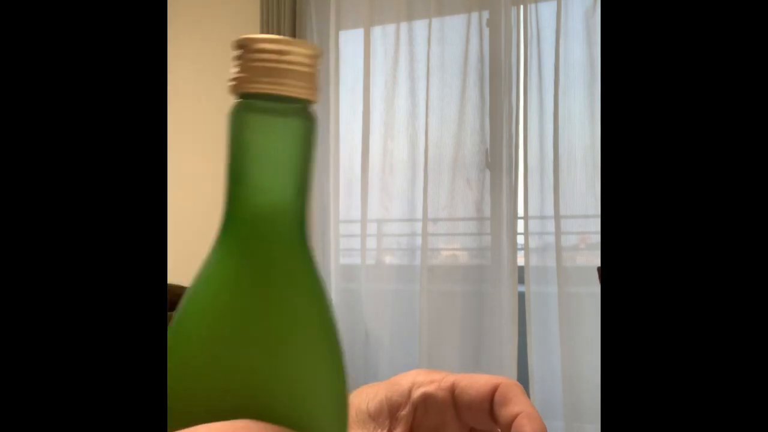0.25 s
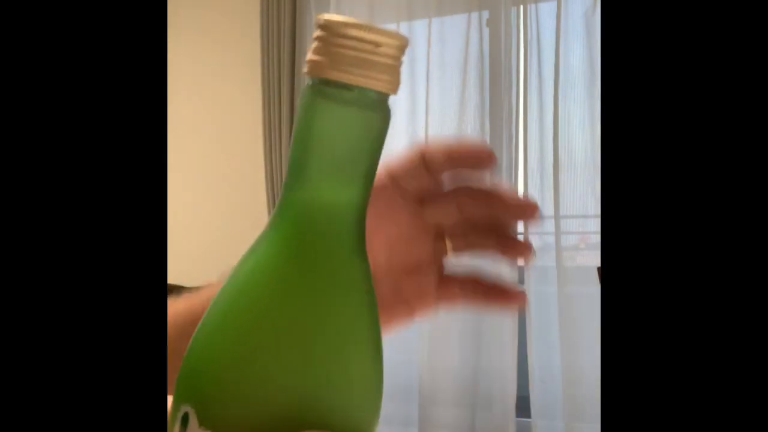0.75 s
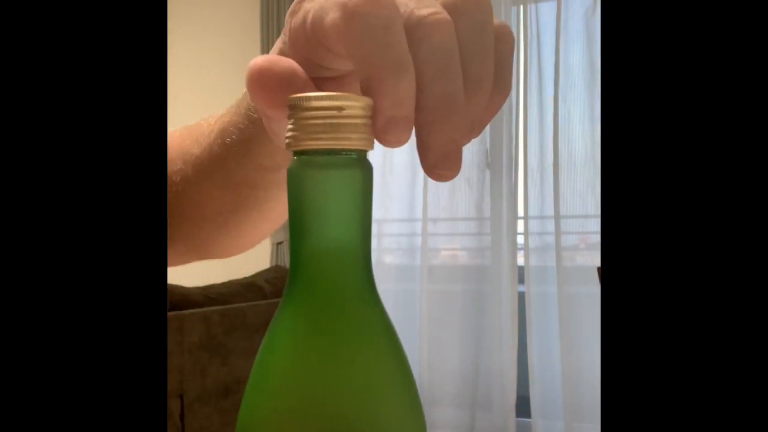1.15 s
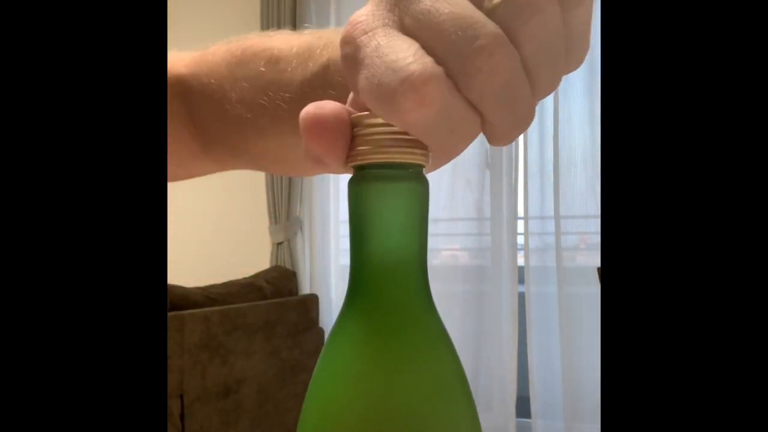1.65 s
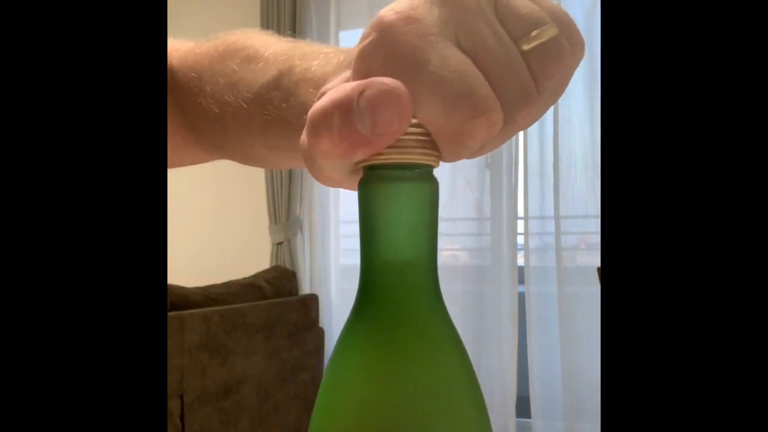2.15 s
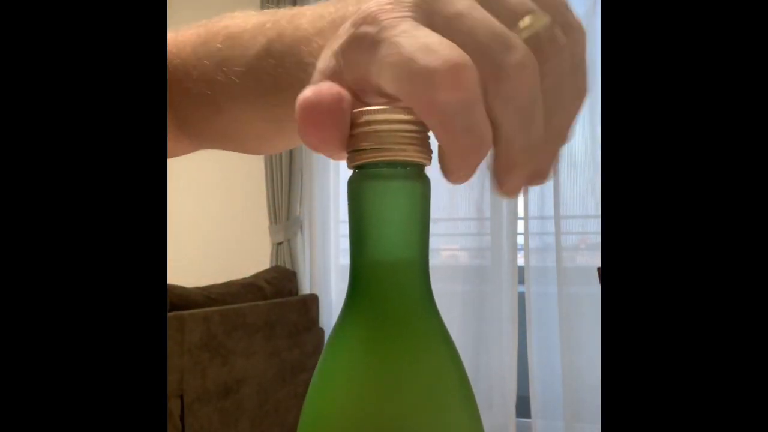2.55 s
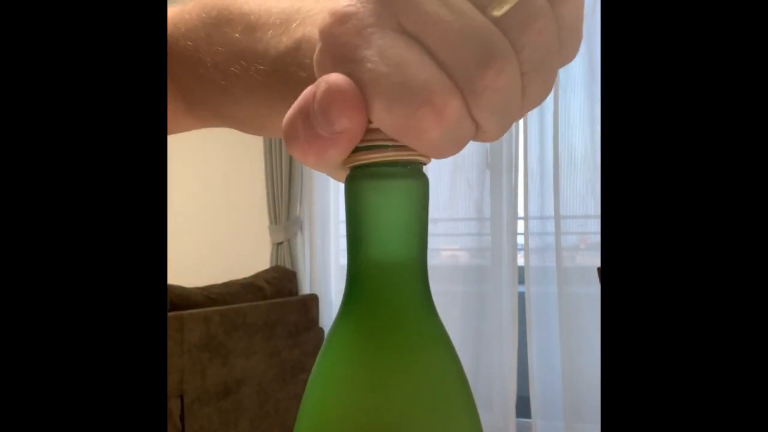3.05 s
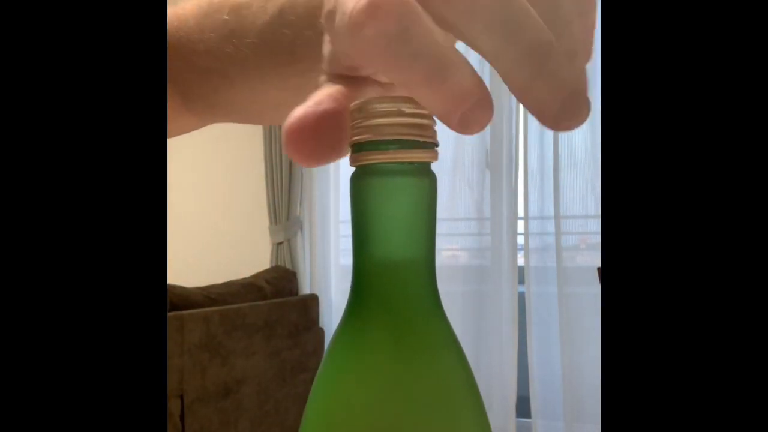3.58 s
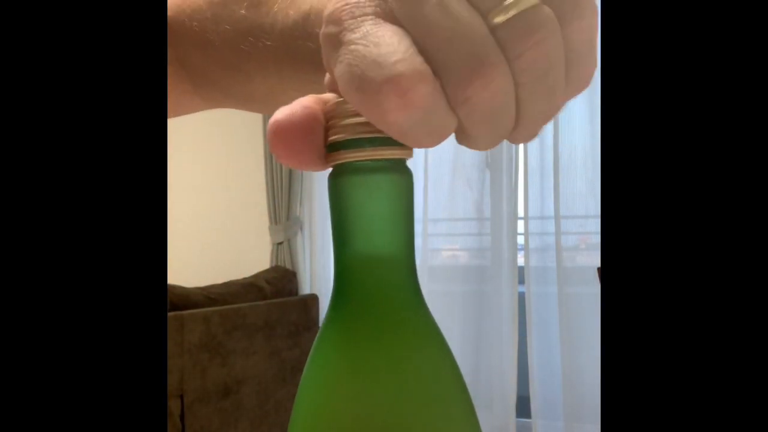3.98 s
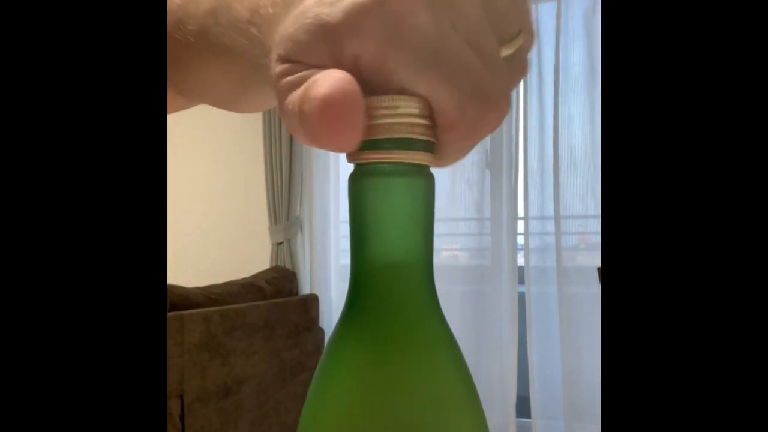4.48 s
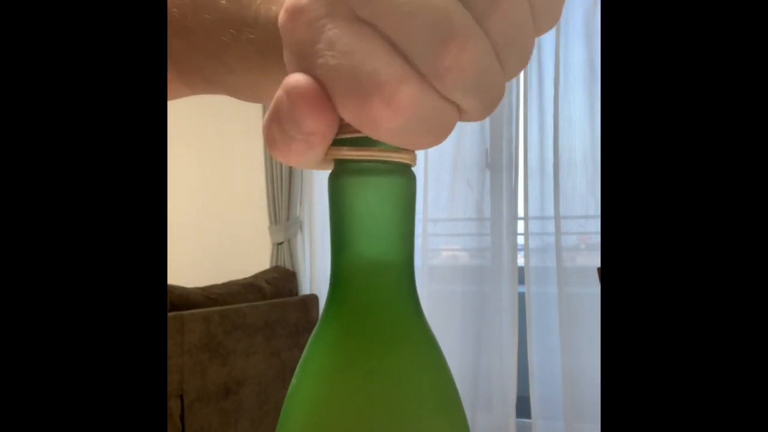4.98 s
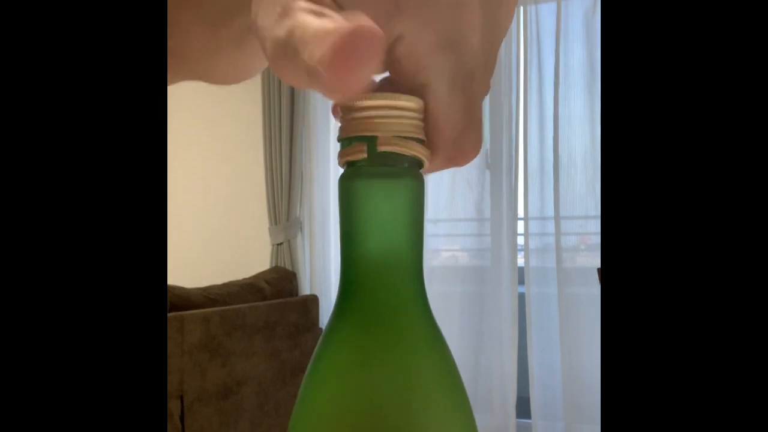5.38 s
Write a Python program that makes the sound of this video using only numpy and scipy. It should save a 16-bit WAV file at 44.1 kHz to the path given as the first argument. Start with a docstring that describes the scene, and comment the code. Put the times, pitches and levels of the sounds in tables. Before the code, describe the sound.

Close up, dull table thumps, then crisp metallic cracks and faint thread scraping as a bottle's screw cap is twisted loose in a small room.

```python
"""A metal screw cap is twisted off a glass bottle on a table, close to a phone on the same table.
First the base knocks and judders: dispersed bending waves (treble first) ring the table's modes.
From about 1.5 s the tapped glass pings faintly; from 2.1 s skin hisses, threads grind, metal squeaks and tears.
Bridges of the seal snap as short noise cracks near 2.2, 3.0 and 5.1 s; at 5.37 s the last goes and the cap rings.
A small living room adds a diffuse tail throughout, over a low background of coloured noise."""
import sys
import numpy as np
from scipy import signal
from scipy.fft import rfft, irfft
from scipy.io import wavfile
from scipy.ndimage import uniform_filter1d, minimum_filter1d

SR = 44100
rng = np.random.default_rng(int(sys.argv[2]) if len(sys.argv) > 2 else 0)


def dump(signal):
    """Clip the signal to [-1, 1] and save it as 16-bit WAV at the path in sys.argv[1]."""
    limited = np.clip(np.atleast_2d(signal).T, -1, 1)
    pcm = np.round(limited * 32767).astype(np.int16)
    wavfile.write(sys.argv[1], SR, pcm)


N = 247842
SIZE = 16384  # FFT length of a knock, samples
TIME = np.arange(N) / SR  # s
FREQ = np.arange(SIZE // 2 + 1) * SR / SIZE  # Hz


def undb(db):
    """Decibels to gain."""
    return 10 ** (np.asarray(db) / 20)


def along(points, hz):
    """Read (Hz, value) points on a log-frequency axis."""
    at_hz, value = np.transpose(points)
    return np.interp(np.log(hz + 1), np.log(at_hz), value)


def unit(x):
    """Scale to rms 1."""
    return x / np.sqrt(np.mean(x ** 2))


def tint(x, points):
    """Give a sound the colour of (Hz, dB) points."""
    n = x.shape[-1]
    hz = np.arange(n // 2 + 1) * SR / n
    return irfft(rfft(x) * undb(along(points, hz)), n)


def blow(x, length_s):
    """Give a hit the energy of an rms-1 burst of this length."""
    return unit(x) * np.sqrt(length_s * SR / x.shape[-1])


def add(out, s, sound):
    """Mix a sound in at time s."""
    i = int(s * SR)
    out[:, i:i + sound.shape[-1]] += sound[..., :N - i]


def efforts(rows, sounds):
    """Each effort of the hand builds to a peak and lets go, driving every sound at its own level."""
    out = np.zeros((2, N))
    for s, rise_s, fall_s, *levels_db in rows:
        effort = np.exp(np.minimum((TIME - s) / rise_s, (s - TIME) / fall_s))
        out += effort * sum(undb(db) * sound for db, sound in zip(levels_db, sounds))
    return out


# phase of the left channel ahead of the right: f/Hz, lead/rad
CHANNEL_LEAD = [(200, 0), (1700, 2.5), (4000, .4), (5500, 2.6), (7000, 1.7), (9100, 3.15), (12000, 5.45),
                (14000, 6.28), (16000, 7.1)]


def to_stereo(x):
    """Spread a sound over two channels, the right one lagging by a frequency-dependent phase."""
    lead_rad = along(CHANNEL_LEAD, np.arange(len(x) // 2 + 1) * SR / len(x))
    return np.array([x, irfft(rfft(x) * np.exp(-1j * lead_rad), len(x))])


def stereo_noise(likeness):
    """Noise in two channels; likeness is the shared fraction of its power."""
    c = np.clip(likeness, 0, 1)
    shared = to_stereo(rng.standard_normal(N))
    return np.sqrt(c) * shared + np.sqrt(1 - c) * rng.standard_normal((2, N))


# spectrum of the quiet room, relative: f/Hz, density/dB
HUSH = [(15, -37), (25, -17), (53, -1), (83, -11), (208, -17.5), (238, -23.5), (304, -14.5), (510, -19),
        (600, -26.5), (878, -25.5), (1470, -33.5), (2400, -36.5), (3320, -51.5), (9000, -63.5),
        (14000, -61.5), (16500, -70.5)]


def hush(level_db=-50.5, knot_s=.1):
    """Low background of the room: coloured noise whose level wavers by about 1 dB."""
    knots_s = np.arange(0, TIME[-1], knot_s)
    waver_db = np.interp(TIME, knots_s, rng.standard_normal(len(knots_s)))
    return unit(tint(stereo_noise(0.08), HUSH)) * undb(level_db + waver_db)


# decay of the room's tail: f/Hz, t60/s
ROOM_T60 = [(80, 1), (350, .5), (1000, 0.45), (4000, 0.43), (8000, 0.33), (15000, 0.24)]
# tail level per band, before each source's wet gain: f/Hz, level/dB
ROOM_SHARE = [(60, -12.5), (200, -12), (400, -5.5), (1000, -6.5), (2500, -6.5), (6000, -5), (8300, -15),
              (12000, -12), (16000, -17.5)]
# shared fraction of the tail's power in the two channels: f/Hz, likeness/0-1
ROOM_LIKENESS = [(300, .3), (4000, 0.4), (8000, 1)]


def room(x, gap_s=0.0065, build_s=0.00065):
    """A diffuse tail, band by band, that sets in after the first wall is reached."""
    t = TIME[:2 * SIZE]
    hz = np.arange(SIZE + 1) * SR / len(t)
    alike = np.clip(along(ROOM_LIKENESS, hz), 0, 1)
    shared = rfft(rng.standard_normal(len(t)))
    separate = rfft(rng.standard_normal((2, len(t))))
    spectrum = np.sqrt(alike) * shared + np.sqrt(1 - alike) * separate
    centres_hz = np.geomspace(60, 16000, 17)
    onset = 1 - np.exp(-np.maximum(t - gap_s, 0) / build_s)
    tail = 0
    for centre_hz, band in zip(centres_hz, np.eye(len(centres_hz))):
        fade = onset * np.exp(-np.log(1000) * t / along(ROOM_T60, centre_hz))
        # overlapping triangular bands
        noise = irfft(spectrum * np.interp(np.log(hz + 1), np.log(centres_hz), band))
        tail = tail + noise * fade / np.linalg.norm(fade) * undb(along(ROOM_SHARE, centre_hz))
    return signal.fftconvolve(x, tail, axes=1)[:, :N]


def bending_waves(first_s=.004, spread_s=.016, fade_s=0.034, echo_db=-5.0, apart=0.63, long_hz=220, count=12):
    """Direct wave and edge reflections in the table; travel time (given at 500 Hz) grows towards the bass."""
    extra_s = spread_s * (np.arange(count) + rng.random(count)) / count
    strength = undb(echo_db) * np.exp(-extra_s / fade_s) * rng.choice([-1, 1], count)
    phase_per_s = -4j * np.pi * np.sqrt(500 * FREQ)
    channel_strength = strength * (1 + apart * rng.standard_normal((2, count)))
    echoes = channel_strength @ np.exp(np.outer(extra_s, phase_per_s))
    # long waves lift the whole top at once; short ones scatter and differ between the channels
    short = FREQ ** 2 / (FREQ ** 2 + long_hz ** 2)
    return np.exp(phase_per_s * first_s) * (1 + short * echoes) / np.hypot(1, short * np.linalg.norm(strength))


# table top under the bottle: f/Hz, width/Hz, level/dB, left minus right/dB, left lead/rad
TABLE_MODES = [(215, 130, -0.5, 1, 1.2), (373, 36.4, 11.5, 9, 2.5), (511.6, 34, 7.5, -4.5, 1),
               (701.5, 45, 12, 1, -1.15), (880, 23, 6, 10, 5.5), (1084, 10, 7, 0, 1),
               (1270, 140, 6, 6, 2.0), (1435, 70, -1, -3.5, 0), (1700, 50, -1.5, 3.5, 3),
               (2000, 88, 3, -2.5, 2), (2410, 450, 10.5, -2.5, -3.5)]
# colour of a knock: f/Hz, level/dB
KNOCK_COLOUR = [(25, -9.5), (50, -3.5), (85, 11), (160, 7.5), (260, 4.5), (400, 3), (600, 2), (850, 8),
                (1300, 3.5), (2200, 0.5), (4000, -10.5), (7000, -25.5), (10000, -41.5), (16000, -43)]


def knock(thud_db, ring_db, edge_db, place_db=2.6, twist_rad=1.7, twist_hz=190):
    """One bump: dispersed waves ring the table's modes, a little differently at each spot of the base."""
    sides = np.array([[.5], [-.5]])
    # the phone rocks on the table, so the channels move out of step above the deep bass
    rocking = FREQ ** 2 / (FREQ ** 2 + twist_hz ** 2)
    body = np.exp(1j * sides * twist_rad * rocking)
    for hz, width_hz, db, pan_db, lead_rad in TABLE_MODES:
        mode = 1j * FREQ * width_hz / (hz ** 2 - FREQ ** 2 + 1j * FREQ * width_hz)
        level = undb(db + place_db * rng.standard_normal() + sides * pan_db)
        body = body + mode * level * np.exp(1j * sides * lead_rad * rocking)
    contact_db = along([(170, thud_db), (380, 0), (750, ring_db), (2400, edge_db)], FREQ)
    spectrum = body * bending_waves() * undb(contact_db + along(KNOCK_COLOUR, FREQ))
    return irfft(spectrum)[:, :SIZE // 2]


# the base bumps the table: t/s, level/dB, thud/dB, upper ring/dB
KNOCKS = [(0.334, -17.5, -7.5, -5), (0.463, -21, -7.5, 9), (0.54, -26, -19.5, 3.5),
          (1.193, -4.5, 0.5, -10.5), (1.416, -5, 0, -5), (1.511, -22, -19, -7), (1.661, -23.5, -10.5, -20),
          (1.804, -31, -8.5, -13.5), (2.102, -21.5, -19.5, -9), (2.391, -30, -2, -14.5),
          (2.708, -18, -10, -11), (2.875, -24.5, -7, -9.5), (3.804, -30, -4.5, -9.5),
          (4.132, -25.5, -7, -11.5), (4.3, -15.5, -2, -4.5), (4.475, -33.5, 2, -14),
          (4.856, -22.5, -5, -15.5), (5.13, -18, 5.5, -14.5), (5.278, -12, -8, -9), (5.361, -7, -13, -8),
          (5.372, -11, -1.5, -1.5)]
# sharper edge for harder, more ringing bumps: dB at level 0, dB per dB of level, dB per dB of ring
EDGE_DB, EDGE_PER_LEVEL, EDGE_PER_RING = -9.5, 0.58, 0.48
# jolt of a snap: lag, level relative to the snap, (thud/dB, upper ring/dB, edge/dB)
JOLT_LAG_S, JOLT_DB, JOLT_COLOUR = .0015, -21.5, (2.5, -5.5, -16)


def bumps():
    """Every blow on the table, from knocks and from the snaps jolting the bottle, with its edge level."""
    blows = []
    for s, db, thud_db, ring_db in KNOCKS:
        edge_db = EDGE_DB + EDGE_PER_LEVEL * db + EDGE_PER_RING * ring_db
        blows.append((s, db, thud_db, ring_db, edge_db))
    for s, db, _, _ in SNAPS:
        blows.append((s + JOLT_LAG_S, db + JOLT_DB, *JOLT_COLOUR))
    return blows


def knocks(scuff_db=-9, before_s=0.0047, after_s=0.0032, scuff_hz=900, early_s=.0016, length_s=0.0093):
    """The knurled base lands on several points, so a brief scuff surrounds each bump."""
    out = np.zeros((2, N))
    t = TIME[:2048] - TIME[1024]
    for s, db, thud_db, ring_db, edge_db in bumps():
        scuff = rng.standard_normal(len(t)) * np.exp(np.minimum(t / before_s, -t / after_s))
        scuff = tint(scuff / np.linalg.norm(scuff), [(100, -12), (scuff_hz, 0)])
        force = (t == 0) + undb(scuff_db) * scuff
        wave = signal.fftconvolve(knock(thud_db, ring_db, edge_db), force[None], axes=1)
        add(out, s + t[0] - early_s, undb(db) * blow(wave, length_s))
    return out


LEAD_IN_S = .01  # silence before a ring


def ring(modes, split_hz=23, twin=0.3, attack_s=0.00038):
    """Fading modes of a nearly round body: each has a weaker twin that beats against it."""
    t = np.maximum(TIME[:SR // 2] - LEAD_IN_S, 0)
    out = 0
    for hz, db, t60_s in modes:
        main = np.sin(2 * np.pi * (hz * t + rng.random()))
        second = twin * np.sin(2 * np.pi * ((hz + split_hz) * t + rng.random()))
        out = out + undb(db - 60 * t / t60_s) * (main + second)
    return to_stereo(out * (1 - np.exp(-t / attack_s)))


# the hand taps the glass: t/s, level/dB, brightness at 13 kHz/dB
PINGS = [(1.505, -36.5, -17), (2.097, -46.5, -3.5)]
# the bottle's glass: f/Hz, level/dB, t60/s
GLASS_MODES = [(3550, -23.5, 0.25), (5480, 0, 0.17), (6105, -17, 0.2), (13560, -13, 0.17),
               (14830, -19.5, 0.3)]
# the loosened cap: f/Hz, level/dB, t60/s
CAP_MODES = [(2260, 0, 0.36), (3430, -3, 0.42), (4610, -6.5, 0.36), (5450, -13, 0.3), (6620, -14, 0.54)]
CAP_FREE_S, CAP_FREE_DB = 5.371, -40.5


def pings():
    """The tapped glass rings in its modes, and so does the cap when it comes free."""
    out = np.zeros((2, N))
    for s, db, bright_db in PINGS:
        glass = tint(ring(GLASS_MODES), [(6000, 0), (13000, bright_db)])
        add(out, s - LEAD_IN_S, undb(db) * glass)
    add(out, CAP_FREE_S - LEAD_IN_S, undb(CAP_FREE_DB) * ring(CAP_MODES))
    return out


# the metal catches and squeaks: t/s, length/s, f/Hz, level/dB
SQUEAKS = [(2.092, 0.017, 3566, -47.5), (2.156, 0.041, 3550, -55.5), (2.468, 0.091, 4450, -73.5),
           (2.78, 0.09, 4420, -81.5), (3.42, 0.053, 15000, -67), (3.866, 0.14, 4360, -81.5),
           (4.533, 0.087, 4490, -70.5), (5.336, 0.032, 3523, -50.5)]


def squeaks(width=0.008):
    """Uneven slips keep one resonance of the cap ringing: noise through two equal narrow peaks."""
    out = np.zeros((2, N))
    for s, length_s, hz, db in SQUEAKS:
        n = int(length_s * SR)
        b, a = signal.iirpeak(hz, 1 / width, SR)
        tone = signal.lfilter(b, a, rng.standard_normal((2, SR // 2)))
        tone = signal.lfilter(b, a, tone)[:, -n:]  # settled part
        add(out, s, undb(db) * unit(tone) * signal.windows.tukey(n, .5))
    return out


# fingers on cap, cap on threads; levels before scene's rub_db: peak t/s, rise/s, fall/s, hiss/dB, grind/dB
RUBS = [(2.099, .002, .025, -74, -46), (2.496, .012, .04, -69, -61.5), (2.822, 0.0075, .015, -72, -77),
        (2.935, .012, .05, -81.5, -50.5), (3.45, 0.022, 0.014, -72.5, -65), (4.22, .075, 0.051, -56, -59.5),
        (4.52, 0.0166, 0.038, -59.5, -67.5), (4.68, 0.12, 0.23, -74.5, -61),
        (4.902, 0.0054, 0.04, -57.5, -40.5), (5.09, 0.047, 0.06, -47.5, -54)]
# colour of skin on metal: f/Hz, level/dB
HISS_COLOUR = [(5000, -16.5), (8000, -7), (11000, -6.5), (14500, -5), (16000, -1.5)]
# colour of the threads: f/Hz, level/dB
GRIND_COLOUR = [(900, -2), (1800, -3.5), (2600, -1), (3300, -8.5), (4150, -3), (5200, -14), (6800, -13),
                (10000, -38.5)]


def sliding(grain_db=1.0, slip_s=0.0058, skin_likeness=1.0, thread_likeness=0.26):
    """Skin hisses over the metal and the threads grind on the glass, in tiny uneven slips."""
    knots_s = np.arange(0, TIME[-1], slip_s)
    slips = np.interp(TIME, knots_s, undb(grain_db * rng.standard_normal(len(knots_s))))
    hiss = unit(tint(slips * stereo_noise(skin_likeness), HISS_COLOUR))
    grind = unit(tint(slips * stereo_noise(thread_likeness), GRIND_COLOUR))
    return efforts(RUBS, (hiss, grind))


def tiny_slips(rate_hz, size_db):
    """Randomly timed impulses of uneven size."""
    hits = rng.random(N) < rate_hz / SR
    return hits * rng.choice([-1, 1], N) * undb(size_db * rng.standard_normal(N))


# hands drag the bottle or wrench at the seal: peak t/s, rise/s, fall/s, crackle/dB, judder/dB
WRENCHES = [(0.535, 0.01, 0.037, -73, -34.5), (0.585, 0.014, 0.023, -85, -38.5),
            (1.215, .006, 0.023, -49.5, -25.5), (1.442, .008, 0.024, -72, -29),
            (1.56, .03, 0.03, -91.5, -36), (2.12, 0.0098, 0.0085, -65, -34.5),
            (2.149, 0.0036, 0.054, -63, -31.5), (2.203, 0.0077, 0.0072, -33.5, -41),
            (2.226, 0.0082, 0.0055, -23, -35.5), (2.25, 0.011, 0.0084, -48.5, -49),
            (5.128, .003, 0.004, -29.5, -28), (5.363, 0.004, 0.0022, -34.5, -22.5),
            (5.372, 0.0053, 0.0037, -29, -34)]
# colour of the tearing metal: f/Hz, level/dB
TEAR_COLOUR = [(900, -12), (2000, -4), (2900, 2), (3800, 3), (4500, -1), (5300, -3.5), (7500, -6.5),
               (12000, -24), (16000, -14)]


def tearing(crack_hz=1400, slip_hz=500, size_db=3, apart=0.24, thud_db=-16, ring_db=-4, edge_db=-22):
    """Under torque the metal gives in countless small cracks while the base judders on the table."""
    shared = to_stereo(tiny_slips(crack_hz, size_db))
    cracks = np.array([channel + apart * tiny_slips(crack_hz, size_db) for channel in shared])
    crackle = unit(tint(cracks, TEAR_COLOUR))
    slips = tiny_slips(slip_hz, size_db)[None]
    judder = unit(signal.fftconvolve(slips, knock(thud_db, ring_db, edge_db), axes=1)[:, :N])
    return efforts(WRENCHES, (crackle, judder))


# colour of a snap: f/Hz, level/dB
SNAP_COLOUR = [(300, -32), (1200, -24.5), (2400, -0.5), (3200, -20.5), (4600, -6.5), (5600, -4),
               (6700, -7.5), (8000, 0.5), (10500, 1), (12000, -2), (14000, 3.5), (15500, 0), (17000, -14)]


def snap(skirt_hz, skirt_db, crack_s=0.000095, bounce_s=0.00045, bounce_db=-2,
         shiver_db=-17, shiver_s=0.0023, length_s=0.00029, skirt_s=0.0019):
    """A bridge cracks, the crack bounces off a near surface, the thin skirt shivers, damped by the fingers."""
    t = np.maximum(TIME[:1024] - TIME[64], 0)
    crack = (t > 0) * np.exp(-t / crack_s)
    bounce = (t >= bounce_s) * np.exp(-np.abs(t - bounce_s) / crack_s)
    shiver = (t > 0) * np.exp(-t / shiver_s)
    envelope = crack + undb(bounce_db) * bounce + undb(shiver_db) * shiver
    burst = envelope * rng.choice([-1, 1], len(t))
    skirt = undb(skirt_db) * np.sin(2 * np.pi * skirt_hz * t) * np.exp(-t / skirt_s)
    # summed over all directions, the crack that feeds the room is an even click
    click = np.diff(np.sign(t), prepend=0)
    return np.array([blow(tint(x, SNAP_COLOUR), length_s) + skirt for x in (burst, click)])


# the seal's bridges snap: t/s, level/dB, skirt f/Hz, skirt ring/dB
SNAPS = [(2.1978, -7.5, 3800, -12), (2.2042, -7, 3650, -13), (2.214, -8.5, 4005, -6.5),
         (2.2265, -12, 3287, -8), (2.2483, -7.5, 3650, -15), (2.9247, -43.5, 4500, -8.5),
         (2.9427, -22, 4400, -44.5), (3, -6.5, 4830, -28), (3.0046, -7, 4450, -10.5),
         (3.1647, -4.5, 4720, -25), (5.1260, -7, 4270, -18.5), (5.3708, -7.5, 3400, -7.5)]


def snaps():
    """All the breaking bridges, as heard straight on and as spread into the room."""
    out = np.zeros((2, N))  # rows: direct, spread
    for s, db, skirt_hz, skirt_db in SNAPS:
        add(out, s - TIME[64], undb(db) * snap(skirt_hz, skirt_db))
    return to_stereo(out[0]), to_stereo(out[1])


def scene(table_wet_db=-2, cap_wet_db=-1.0, tear_wet_db=-2, rub_db=-3):
    """Table-borne knocks and airborne cap sounds; all but the pings and the hush feed the room."""
    table = knocks()
    rub = undb(rub_db) * sliding() + squeaks()
    tear = tearing()
    cracks, spread = snaps()
    to_room = undb(table_wet_db) * table + undb(cap_wet_db) * (spread + rub) + undb(tear_wet_db) * tear
    return table + cracks + rub + tear + pings() + room(to_room) + hush()


def record(dry, ceiling=.95, window=265, top_hz=16800):
    """The phone's limiter eases the loudest peaks of both channels alike; a steep low-pass cuts the top."""
    gain = ceiling / np.maximum(np.abs(dry).max(axis=0), ceiling)
    gain = uniform_filter1d(minimum_filter1d(gain, window), window)  # window in samples
    # run both ways: zero phase, twice the ripple and rejection in dB
    low_pass = signal.ellip(8, .1, 60, top_hz, fs=SR, output="sos")
    return signal.sosfiltfilt(low_pass, dry * gain)


dry = scene()
out = record(dry)
dump(out)
```